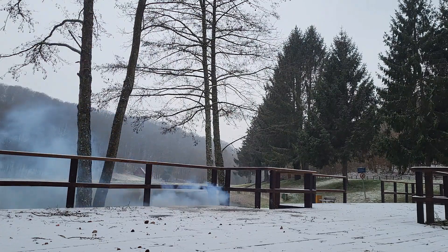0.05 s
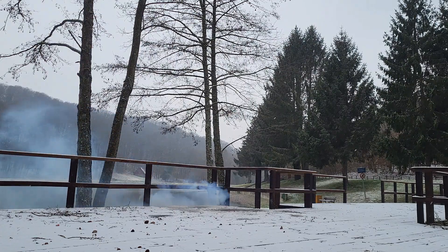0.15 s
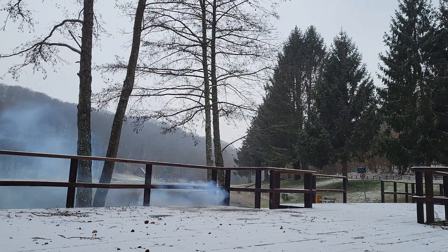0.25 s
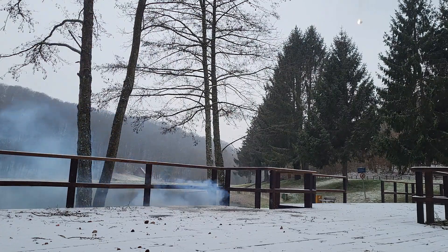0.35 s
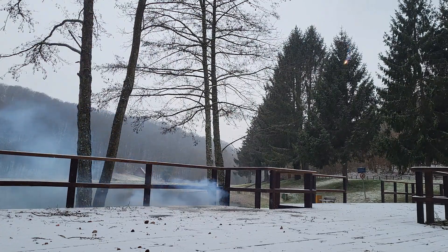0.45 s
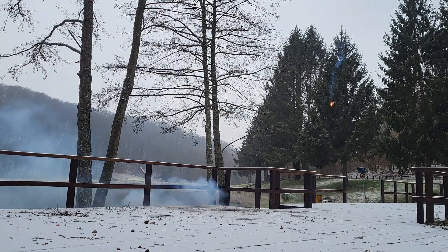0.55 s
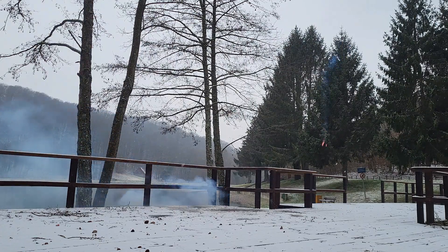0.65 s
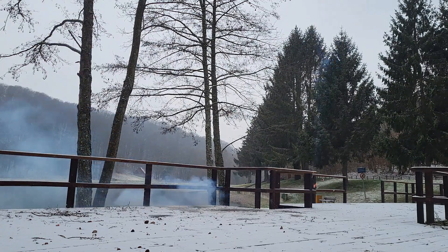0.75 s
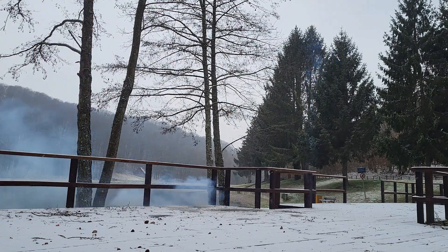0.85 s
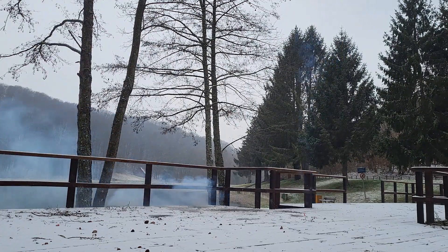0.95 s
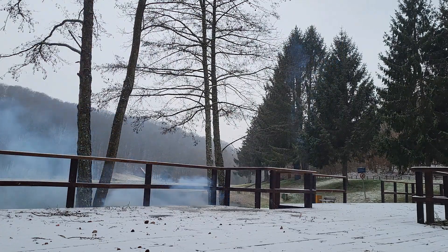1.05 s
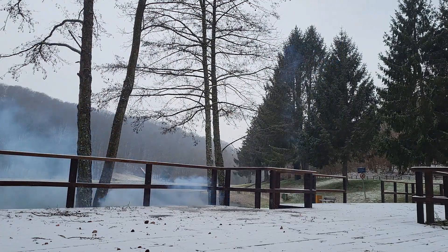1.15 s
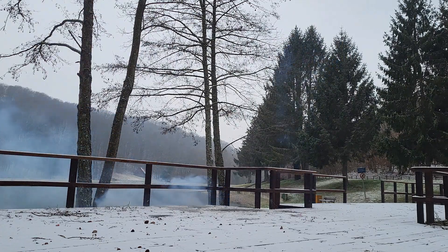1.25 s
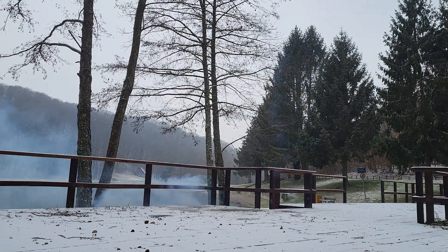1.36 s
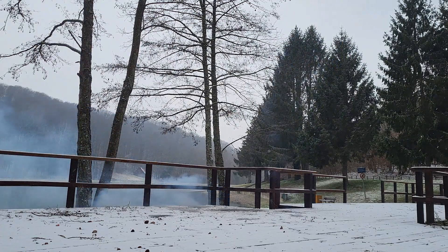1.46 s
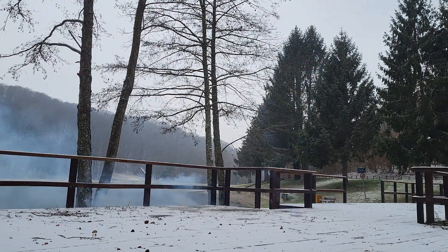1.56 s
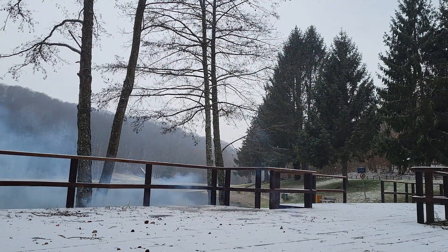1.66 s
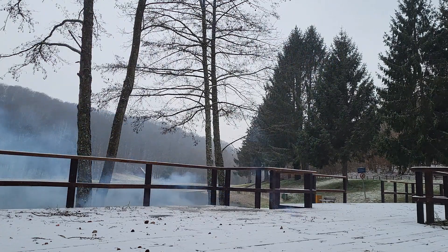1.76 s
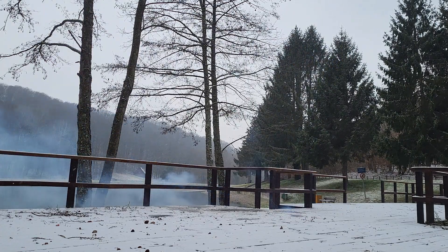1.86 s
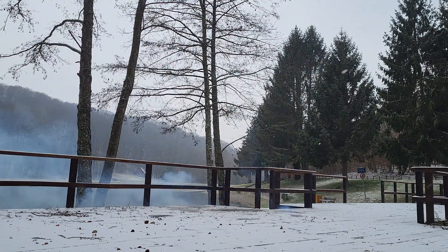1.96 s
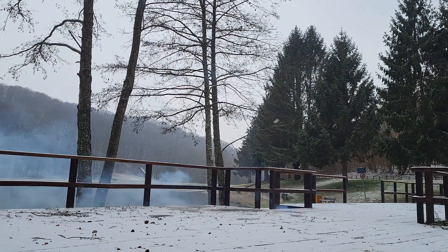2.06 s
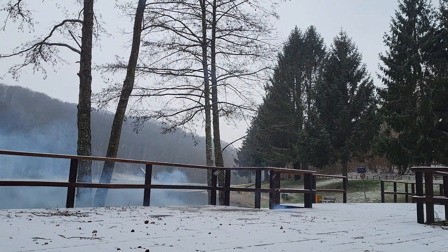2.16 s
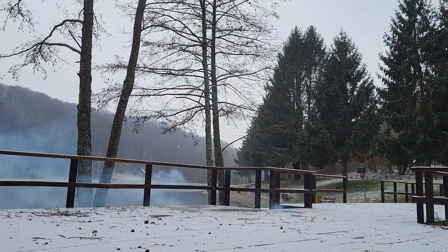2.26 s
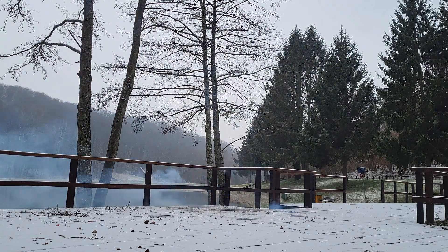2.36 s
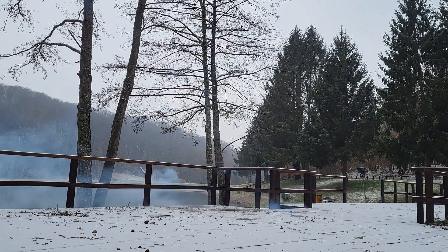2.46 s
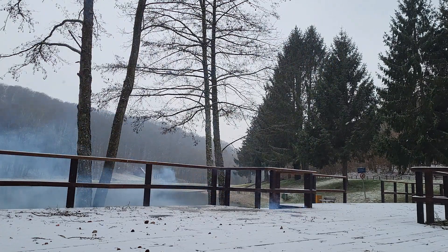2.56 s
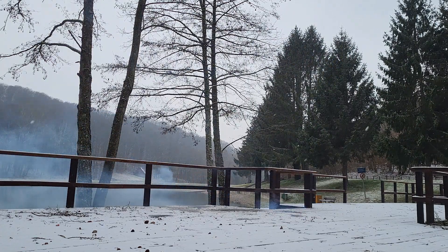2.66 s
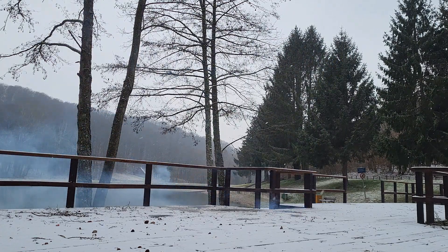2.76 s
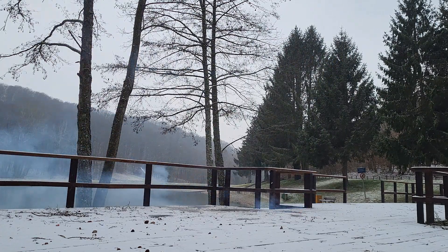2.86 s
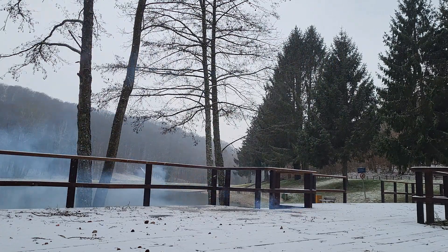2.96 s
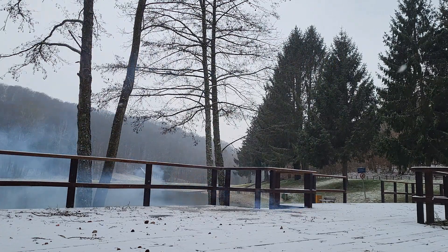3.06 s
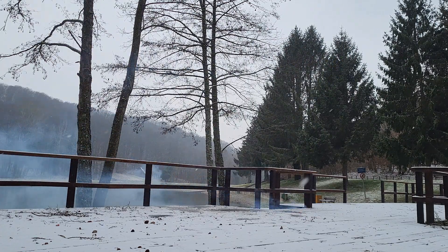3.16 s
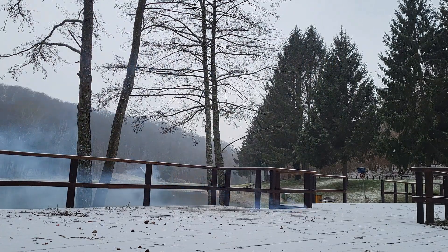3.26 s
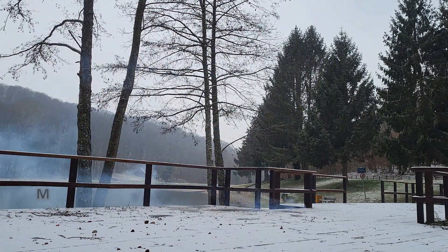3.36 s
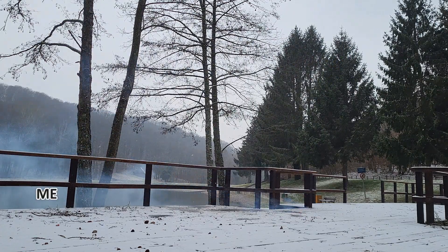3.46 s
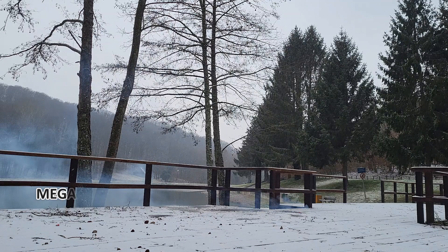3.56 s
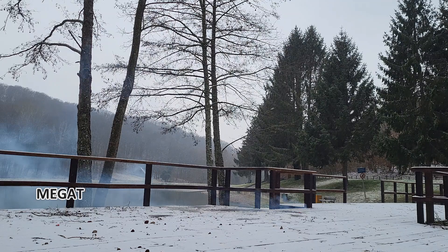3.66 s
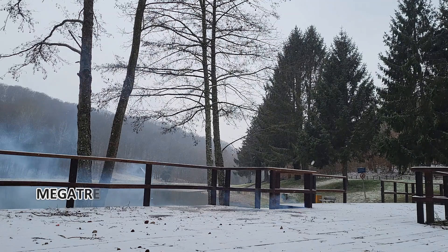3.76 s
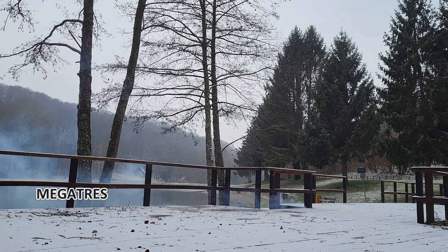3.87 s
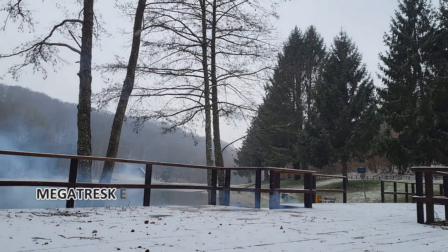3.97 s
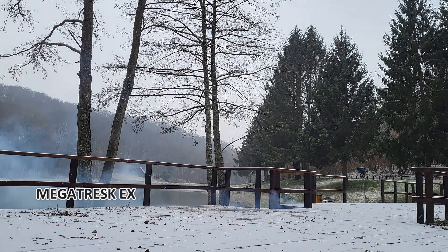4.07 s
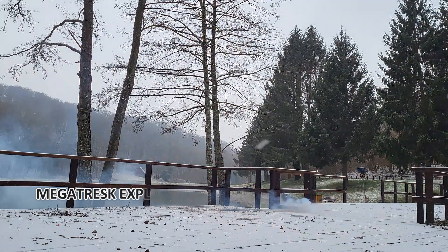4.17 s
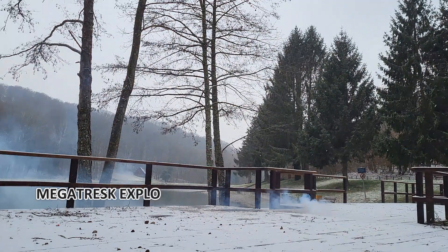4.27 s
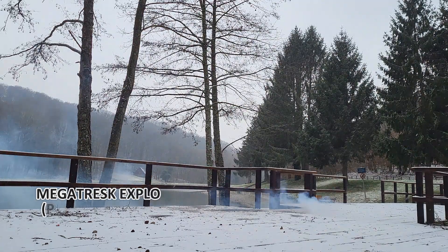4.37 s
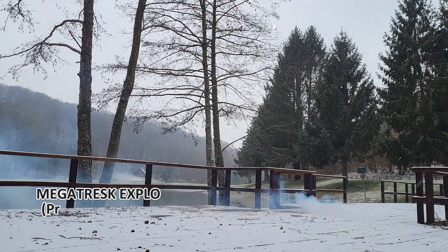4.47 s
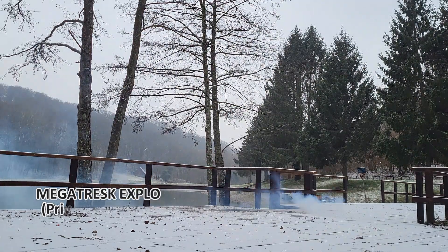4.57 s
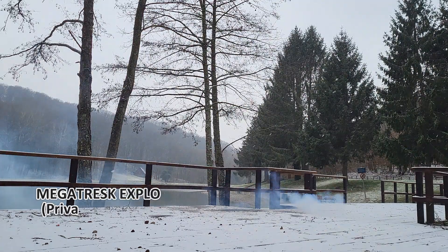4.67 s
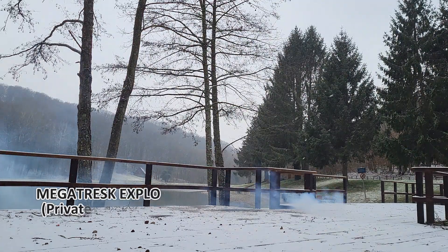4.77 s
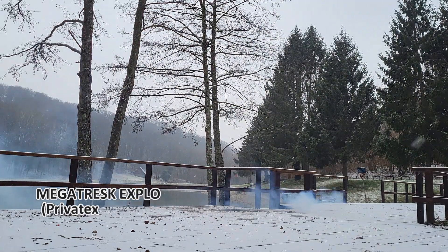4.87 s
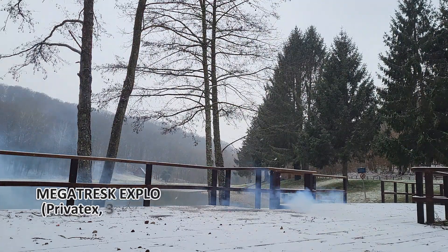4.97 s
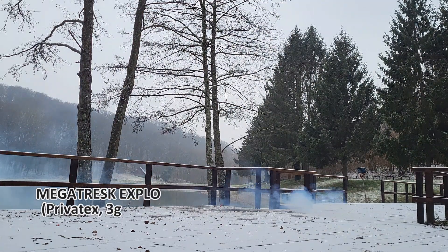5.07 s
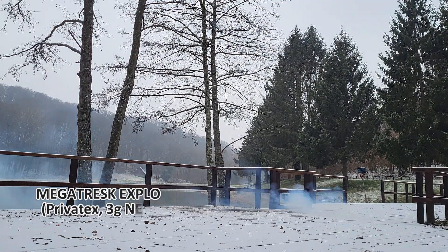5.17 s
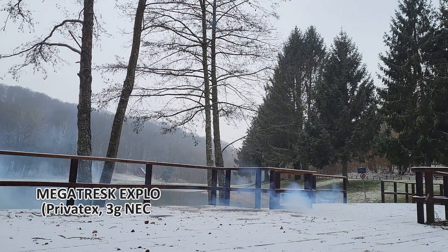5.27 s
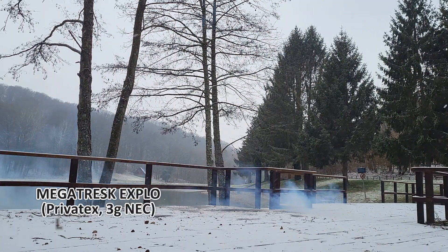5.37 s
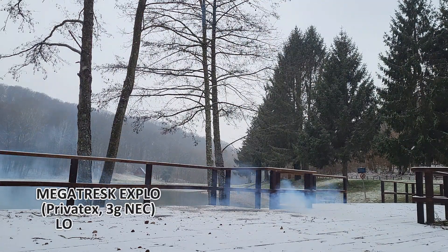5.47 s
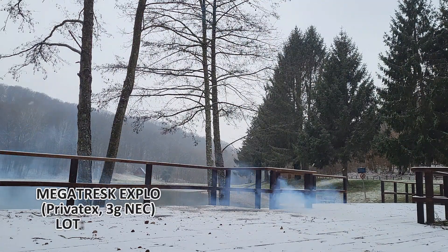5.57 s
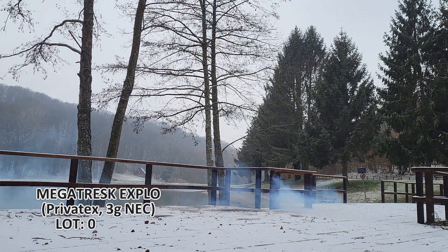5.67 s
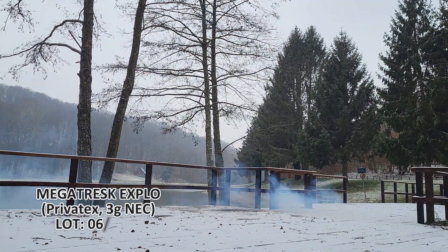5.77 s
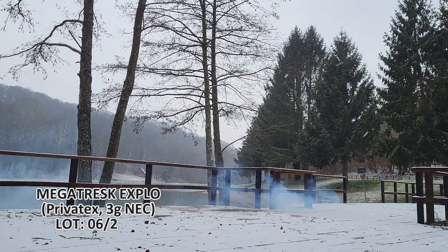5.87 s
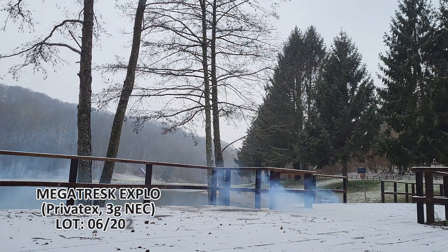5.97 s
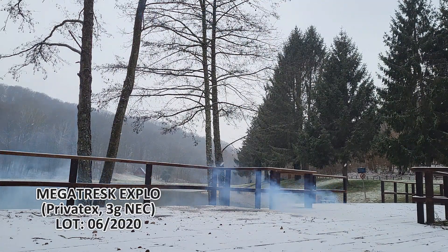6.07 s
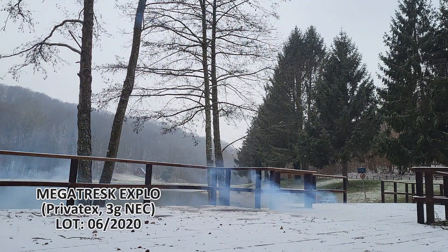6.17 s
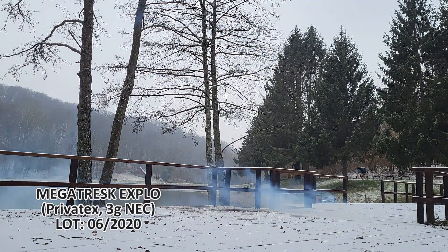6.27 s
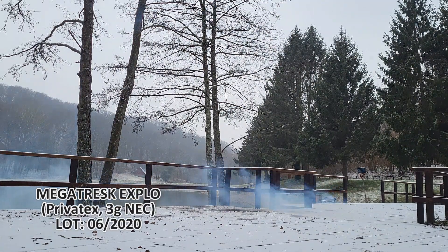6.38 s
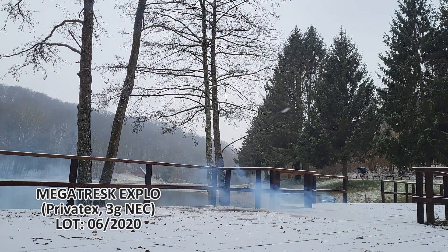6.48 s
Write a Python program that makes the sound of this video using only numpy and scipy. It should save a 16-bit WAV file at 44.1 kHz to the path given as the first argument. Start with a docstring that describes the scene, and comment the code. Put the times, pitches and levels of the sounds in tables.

```python
"""A snowy lakeside terrace in a wooded valley: firecrackers, heard by a phone with two microphone ports.
One bang has just gone off and its echo rolls round the hills, built from pressure swings and scattered noise.
Cloth rustles, a lighter clicks on the right as ringing modes, and a fuse hisses as sputtering noise.
The cracker is thrown past the phone, lands ahead and bangs; trunks and slopes send the bang back for seconds."""
import sys
import numpy as np
from scipy import signal
from scipy.fft import rfft, irfft
from scipy.io import wavfile
from scipy.ndimage import uniform_filter1d

SR = 44100
rng = np.random.default_rng(int(sys.argv[2]) if len(sys.argv) > 2 else 0)


def bounce(signal):
    """Save signal as a 16-bit WAV file at the path given by the first command-line argument."""
    frames = np.transpose(np.atleast_2d(signal))
    limited = np.clip(frames, -1, 1)
    pcm = np.round(limited * 32767).astype(np.int16)
    wavfile.write(sys.argv[1], SR, pcm)


N = 287774
T = np.arange(N) / SR
PORT_LAG_S = 0.00051  # longest lag between the two ports
SOUND_M_S = 343
TOP_HZ = 15900  # where the microphone's treble ends


def undb(db):
    """Decibels to gain."""
    return 10 ** (np.asarray(db) / 20)


def step(x, width):
    """A smooth step from 0 to 1 as x passes zero."""
    return .5 + .5 * np.tanh(x / width / 2)


def swell(s, half_s, db):
    """A smooth rise and fall of gain around one moment."""
    return undb(db) * np.exp(-((T - s) / half_s) ** 2)


def panned(x, db, pan_db):
    """Set the level of a stereo sound and its left minus right balance."""
    left = x[0] * undb(db + pan_db / 2)
    right = x[1] * undb(db - pan_db / 2)
    return np.array([left, right])


def spectrum_db(points, hz):
    """Read (Hz, dB) points on a log-frequency axis."""
    f, db = np.transpose(points)
    return np.interp(np.log(np.maximum(hz, 1)), np.log(f), db)


def colour(x, points, size=4096):
    """Causal minimum-phase filter with the given spectrum; white noise keeps its level."""
    gain = undb(spectrum_db(points, np.fft.rfftfreq(size, 1 / SR)))
    cepstrum = irfft(np.log(gain))
    # fold the cepstrum forward so the response starts at once
    cepstrum[1:size // 2] *= 2
    cepstrum[size // 2 + 1:] = 0
    response = irfft(np.exp(rfft(cepstrum)))
    response /= np.linalg.norm(response)
    return signal.oaconvolve(x, response[None])[:, :N]


def sweep(x, db_at, size=256):
    """Filter whose gain db_at(Hz, s) changes with time."""
    hz, s, frames = signal.stft(x, SR, nperseg=size)
    frames = frames * undb(db_at(hz[:, None], s))
    return signal.istft(frames, SR, nperseg=size)[1][..., :N]


def arrivals(s, gain, bearing, lean=0):
    """Impulses at both ports; one from the right reaches the left port later, and lean favours the left."""
    lag = PORT_LAG_S * np.sin(bearing) / 2
    ports = []
    for side in (1, -1):  # left, right
        sample = np.maximum((s + side * lag) * SR, 0).astype(int)
        ports.append(np.bincount(sample, gain * (1 + side * lean), N)[:N])
    return np.array(ports)


def scatter(regions, uneven_db, shading=0.21, count=50000):
    """Many small reflections: each region swells as the shock sweeps into it, then fades."""
    out = 0
    for peak_s, rise_s, db, fade, bearing, spread in regions:
        s = rng.uniform(0, N / SR, count)
        sign, size, angle, shade = rng.standard_normal((4, count))
        gain = np.sign(sign) * undb(uneven_db * size)
        gain *= np.sqrt(N / np.sum(gain ** 2))
        rise = np.exp(-(np.minimum(s - peak_s, 0) / rise_s) ** 2)
        gain *= rise * undb(db - fade * np.maximum(s - peak_s, 0))
        # the phone and the hand shade each path a little, at one port or the other
        out = out + arrivals(s, gain, bearing + spread * angle, shading * shade)
    return out


# The pressure swings behind the shock front.
# Each row: settled pitch in Hz, relative level in dB, time to fall 60 dB in seconds.
SWING_MODES = [(397.4, -0.5, 0.015), (612, -9.5, 0.03), (203, -12.5, 0.028), (58, -27, .06)]


def pressure_swings(rise_s=0.00091, hurry_s=0.00052, size=8192):
    """The dying swings of one blast wave; the first is the briefest."""
    t = T[:size]
    hurried = t + hurry_s * (1 - np.exp(-t / hurry_s))
    swings = sum(undb(db - 60 * t / t60) * np.sin(2 * np.pi * hz * hurried)
                 for hz, db, t60 in SWING_MODES)
    return (1 - np.exp(-t / rise_s)) * swings


# The shock itself and its clearest echoes.
# Each row: delay in seconds, level in dB, sharp front over that level in dB, bearing in radians (right positive).
SHOCK_PATHS = [(0, 7.5, -6.5, .2), (.005, -12.5, 5.5, .6), (.0065, -17.5, 8.5, .7), (.0097, -12.5, 9.5, .2),
               (.0185, -2.5, -11, .2), (.028, -4, -10.5, .1), (0.0426, -10, 6, 0), (.046, -7, -3, .3),
               (.0665, -14.5, 10.5, .8), (0.0778, -8, -11, .9), (.109, -15, -8, .6), (.128, -16, -8, .9),
               (.148, -25, -8, .5), (0.193, -15, -14, -1.0)]


def shock(front_s=0.000087, front_lean=-.22, splinter_db=-12, splinter_s=.0005, size=1024):
    """A sheer front that splinters on nearby edges, then the swings; each path keeps its own share of front."""
    t = T[:size]
    s, db, front_db, bearing = np.transpose(SHOCK_PATHS)
    body = signal.oaconvolve(arrivals(s, undb(db), bearing), pressure_swings()[None])
    splinters = rng.standard_normal((2, size)) * np.exp(-t / splinter_s)
    front = np.exp(-t / front_s) + undb(splinter_db) * splinters
    front_arrivals = arrivals(s, undb(db + front_db), bearing, front_lean)
    crack = signal.oaconvolve(front_arrivals, front, axes=1)
    return body[:, :N] + crack[:, :N]


# Ring of the planks and railing.
# Each row: pitch in Hz, level in dB, time to fall 60 dB in seconds.
DECK_MODES = [(42, -28, .18), (66, -24, .2), (88, -23, .2), (122, -17, .24), (174, -19, .26),
              (214, -17, .26), (309, -15, .28), (397, -17, .28), (442, -22, .26), (607, -13.5, .28),
              (680, -20, .28), (729, -17, .3), (852, -21.5, .3), (952, -22, .3), (991, -22, .3),
              (1050, -24, .3), (1204, -24.5, .36), (1372, -26, .32), (2729, -32, .45)]


def deck(rise_s=0.0051, bearing=.3, size=22050):
    """The blast sets the planks and railing ringing briefly, as a sum of decaying modes."""
    t = T[:size]
    ring = sum(undb(db - 60 * t / t60) * np.sin(2 * np.pi * (hz * t + rng.random()))
               for hz, db, t60 in DECK_MODES)
    ring = ring * (1 - np.exp(-t / rise_s))
    return signal.oaconvolve(arrivals(np.zeros(1), np.ones(1), bearing), ring[None])[:, :N]


def thickets(x, depth_db=0.5, patchy_db=0.77, smooth_samples=1000, count=9):
    """Uneven stands of trees return the sound in surges, a little different in each octave."""
    lumps = uniform_filter1d(rng.standard_normal((count + 1, N)), smooth_samples)
    lumps = uniform_filter1d(lumps, smooth_samples // 2)
    shared, *octaves = lumps / lumps.std()
    centres = np.log2(TOP_HZ) - np.arange(count)

    def db_at(hz, s):
        """Shared surge plus a crossfade between neighbouring octaves' surges."""
        weights = np.sqrt(np.maximum(1 - abs(np.log2(hz + 1) - centres), 0))
        patches = np.array([np.interp(s, T, lump) for lump in octaves])
        return depth_db * np.interp(s, T, shared) + patchy_db * weights @ patches
    return sweep(x, db_at, size=512)


# Steep banks and stands of trees that answer with a thud of their own.
# Each row: delay in seconds, base level in dB, bearing in radians (right positive).
STEEP_FACES = [(.222, -31, -0.45), (.456, -36, -1.4), (.532, -37, -1.7), (.655, -41, -1.3),
               (1.278, -48, -1.5), (1.688, -38.5, -1.1), (1.73, -36, -0.51), (1.829, -35, -0.45),
               (2.012, -37, -0.48), (2.2, -35, -0.29), (2.333, -35, -0.53), (2.363, -39, -0.56),
               (2.422, -35.5, -0.54), (2.528, -37, -0.6), (2.56, -34.5, -0.53), (2.648, -36.5, -0.8),
               (2.765, -35, -.3), (2.873, -32.5, -0.21), (2.967, -34, -0.49), (3.087, -38, 0.3),
               (3.13, -39.5, 0), (3.24, -40.5, -0.2), (3.287, -42, -0.62), (3.398, -43.5, -0.39)]
FACE_SPREAD_RAD = 0.36


def faces(rise_s=0.0041, fade_db_per_s=330, thud_db=10, smear_db=-2):
    """Each steep bank or stand of trees throws back the blast wave as one dull thud, with a short smear."""
    regions = [(s, rise_s, db + smear_db, fade_db_per_s, bearing, FACE_SPREAD_RAD)
               for s, db, bearing in STEEP_FACES]
    s, db, bearing = np.transpose(STEEP_FACES)
    thuds = signal.oaconvolve(arrivals(s, undb(db + thud_db), bearing), pressure_swings()[None])[:, :N]
    return thuds + colour(scatter(regions, uneven_db=4, count=16000), BLAST_SPECTRUM)


# Scatter from the railing, deck and nearest trunks, then from shore trees, firs, hillside and far slopes.
# Each row: strongest at delay in seconds, rise in seconds, level in dB, fade in dB per second,
# bearing in radians (right positive), spread in radians.
TERRACE_SCATTER = [(.006, 0.0049, -12.5, 186, 0.37, 0.97), (.055, 0.038, -16, 166.5, 0.28, 1.2)]
WOODS_SCATTER = [(.065, 0.064, -20.5, 93, .4, 1.56), (.22, 0.04, -34, 17.2, .9, 1.15),
                 (.46, 0.043, -43.5, 13.5, -1.2, 0.58), (1.8, 0.42, -35.5, 5.1, -0.74, 1.44),
                 (1.725, 0.015, -36.5, 15, -1.0, 0.53), (2.62, 0.82, -33, 11.5, -0.23, 1.35)]
# Tone of the near blast and of the woods' answer. Each row: frequency in Hz, relative level in dB.
BLAST_SPECTRUM = [(25, -28), (60, -17), (130, -1.5), (200, 1), (310, 3), (480, 2), (640, 0), (850, -5.5),
                  (1300, -5.5), (1900, -13.5), (4000, -17.5), (7650, -23), (9500, -32.5), (15500, -22.5)]
WOOD_SPECTRUM = [(25, -29), (45, -7.5), (80, -0.5), (140, 1), (300, 0.3), (480, 0), (650, 1), (850, -5.5),
                 (1300, -5.5), (2000, -8), (4000, -9.5), (7400, -9.5), (9000, -15.5), (15000, -19)]


def bang(air_db_per_s=118, relax_hz=8800, thin_hz=60, terrace_pan_db=-3.0):
    """One explosion with its echoes; cold air takes more treble the longer the sound has travelled."""
    terrace = colour(scatter(TERRACE_SCATTER, uneven_db=5.5), BLAST_SPECTRUM)
    left, right = shock() + deck() + panned(terrace, 0, terrace_pan_db)
    # the close blast is thin in the bass on the right
    right = signal.filtfilt(*signal.butter(1, thin_hz, "high", fs=SR), right, padtype=None)
    near = np.array([left, right])
    far = thickets(colour(scatter(WOODS_SCATTER, uneven_db=3.0), WOOD_SPECTRUM)) + faces()
    return sweep(near + far, lambda hz, s: -air_db_per_s * s * hz ** 2 / (hz ** 2 + relax_hz ** 2))


# The bangs; the first goes off just before the start. Each row: start in seconds, level in dB.
BANG_TIMES = [(-0.172, 0.48), (4.253, 0)]
# both ports leak bass, the right more; the left is duller
RIGHT_BASS_HZ, LEFT_BASS_HZ, LEFT_TREBLE_HZ = 104.4, 40, 13000


def bangs(pan_db=-0.07):
    """Each bang at its moment, coloured a little differently by the two ports."""
    out = np.zeros((2, N))
    for s, db in BANG_TIMES:
        start = int(s * SR)
        heard = bang()[:, max(-start, 0):N - max(start, 0)]
        out[:, max(start, 0):N + min(start, 0)] += undb(db) * heard
    left = signal.lfilter(*signal.butter(1, [LEFT_BASS_HZ, LEFT_TREBLE_HZ], "band", fs=SR), out[0])
    right = signal.lfilter(*signal.butter(1, RIGHT_BASS_HZ, "high", fs=SR), out[1])
    return panned(np.array([left, right]), 0, pan_db)


# Tone of rubbing cloth. Each row: frequency in Hz, relative level in dB.
CLOTH_SPECTRUM = [(1000, -21.5), (3500, -2), (5500, -2), (7500, 5), (9000, -3.5), (11000, -13),
                  (13000, -4.5), (15500, -10)]
# Hands and sleeves rub on the right. Each row: centre in seconds, half length in seconds, level in dB.
RUB_SWELLS = [(0.899, 0.39, -85.5), (1.87, 0.32, -71), (2.18, 0.13, -66.5), (2.574, 0.19, -68.5),
              (3.017, 0.18, -66), (6.263, 0.068, -77), (6.504, 0.15, -79)]
# One brisk scrape of the hands, a single row: centre in seconds, half length in seconds, level in dB.
HAND_SCRAPE = (6.478, 0.022, -46.5)


def rustle(grain_db=4, pan_db=-3, scrape_pan_db=-9):
    """Cloth and fingers rub in tiny slips: grainy noise, swelling with each movement."""
    slips = rng.standard_normal((2, N)) * undb(grain_db * rng.standard_normal(N))
    slips /= slips.std()
    rubs = colour(slips, CLOTH_SPECTRUM) * sum(swell(*row) for row in RUB_SWELLS)
    scrape = colour(slips, HISS_SPECTRUM) * swell(*HAND_SCRAPE)
    return panned(rubs, 0, pan_db) + panned(scrape, 0, scrape_pan_db)


# Puffs of air on the ports. Each row: centre in seconds, half length in seconds, level in dB.
PUFF_SWELLS = [(2.406, 0.023, -47), (2.713, 0.019, -39.5), (2.933, 0.35, -51.5), (3.355, 0.067, -49.5),
               (3.602, 0.054, -46.5)]
# Tone of a puff. Each row: frequency in Hz, relative level in dB.
PUFF_SPECTRUM = [(15, -3.5), (30, -11), (60, 8.5), (110, -4.5), (220, -14), (600, -35), (3000, -74)]


def puffs(pan_db=5):
    """Stirred air buffets each port on its own with a soft low thud."""
    air = colour(rng.standard_normal((2, N)), PUFF_SPECTRUM)
    return panned(air * sum(swell(*row) for row in PUFF_SWELLS), 0, pan_db)


# The lighter's snap and rebound. Each row: start in seconds, strength in dB.
LIGHTER_CLICKS = [(2.5426, 0.5), (2.5807, -28)]
# The lighter's ring. Each row: pitch in Hz, relative level in dB, time to fall 60 dB in seconds.
LIGHTER_MODES = [(2200, -34, .012), (3127, -32, 0.032), (3330, -33, .034), (4780, -35, 0.04),
                 (5140, -37, .03), (6284, -38, .035), (6640, -34, .028), (7050, -25.5, .018),
                 (7460, -11.5, .004), (7790, -30, .028), (7940, -29.5, 0.026), (8860, -9, 0.0042),
                 (9180, -27, .022), (9520, -29, .018), (13640, -33, .018)]


def lighter(shadow_db=-17, hands_db=-41.0, hands_t60=0.085, terrace_db=-53, terrace_t60=0.67,
            contact_s=0.00013):
    """A snap and a small rebound ring the lighter by the right port; hands and terrace scatter them to both."""
    out = 0
    for s, strength_db in LIGHTER_CLICKS:
        t = np.maximum(T - s, 0)
        ring = sum(undb(db - 60 * t / t60) * np.sin(2 * np.pi * hz * t) for hz, db, t60 in LIGHTER_MODES)
        ring = ring * (1 - np.exp(-t / contact_s))
        tail = undb(hands_db - 60 * t / hands_t60) + undb(terrace_db - 60 * t / terrace_t60)
        scattered = colour(rng.standard_normal((2, N)) * tail * (t > 0), HISS_SPECTRUM)
        direct = np.array([undb(shadow_db) * ring, ring])
        out = out + undb(strength_db) * (direct + scattered)
    return out


# the throw: a straight line from behind the phone, past its right side, to the landing place
PASSES_S, THROW_M_S, BESIDE_M, BEHIND_M, AHEAD_M = 3.583, 8.46, 0.49, 1.21, 3.1


def flight():
    """Distance (m) and bearing (rad) of the cracker: held, thrown at a steady speed, then lying still."""
    along = np.clip(THROW_M_S * (T - PASSES_S), -BEHIND_M, AHEAD_M)
    return np.hypot(along, BESIDE_M), np.arctan2(BESIDE_M, along)


# The cracker tumbles and part of its hiss flares.
# Each row: centre in seconds, half length in seconds, extra level in dB, centre pitch in Hz.
HISS_FLARES = [(3.39, .05, 4, 7510), (3.545, 0.045, 7, 7520), (3.64, 0.04, 7.5, 14500),
               (3.774, 0.11, 3, 2495)]
FLARE_OCTAVES = 0.9


def flare_db(hz, s):
    """Extra level of the hiss, by pitch and time, while the jet faces the phone."""
    total = 0
    for at, half_s, db, centre in HISS_FLARES:
        octaves = np.log2((hz + 1) / centre)
        total = total + db * np.exp(-((s - at) / half_s) ** 2 - (octaves / FLARE_OCTAVES) ** 2)
    return total


# the swish of the fly-by: when it is deepest, its half length, depth, width and fall
SWISH_S, SWISH_HALF_S, SWISH_DB, SWISH_OCTAVES, SWISH_OCTAVES_PER_S = 3.66, .09, -9.5, .22, 4.7
SWISH_LEFT_HZ, SWISH_RIGHT_HZ = 6310, 10700  # its centre at each port as the cracker passes


def swish_db(hz, s, passing_hz):
    """A hollow that slides down through the hiss as the cracker flies by."""
    centre = passing_hz * 2 ** (-SWISH_OCTAVES_PER_S * (s - PASSES_S))
    octaves = np.log2((hz + 1) / centre)
    return SWISH_DB * np.exp(-((s - SWISH_S) / SWISH_HALF_S) ** 2 - (octaves / SWISH_OCTAVES) ** 2)


# Tone of the hiss, also lent to lighter and scrape. Each row: frequency in Hz, relative level in dB.
HISS_SPECTRUM = [(300, -20.5), (1000, 1), (1700, 0), (2300, 0), (3100, -2), (4500, -1), (6400, -1.5),
                 (7600, 0.5), (8800, -7.5), (10000, -7.5), (11200, -12), (13000, -3.5), (15500, -8)]
# the fuse catches and burns up to full strength; level at 1 m
CATCH_S, FULL_BURN_S, GROW_DB_PER_S, FUSE_DB = 2.74, 3.276, 39, -43.5
# the thrower's body hides it until the arm swings out
SWING_OUT_S, SWING_S, HIDDEN_DB = 3.25, 0.052, -13
# the thrower's body and arm reflect the hiss until the cracker flies past:
# detour as the arm swings out and as the cracker passes (m), strength (dB)
HELD_DETOUR_M, PASSING_DETOUR_M, BODY_ECHO_DB = .76, .67, -4.5
# centre of the jet's hiss when the cracker comes and when it goes
JET_COMING_HZ, JET_GOING_HZ = 7420, 3700
# beyond this bearing the phone shades the treble at its left port
SHADE_DB, SHADE_RAD, SHADE_EDGE_RAD, SHADE_HZ = -14.5, 0.74, .15, 3900


def fuse(jet_db=4, jet_octaves=0.94, sputter_db=0.34, spark_db=3, diffuse=1.0, pan_db=-1,
         sputter_samples=200):
    """The fuse's gas jet sputters, darkens as it flies past and swings from the right to the front."""
    metres, bearing = flight()
    in_view = step(T - SWING_OUT_S, SWING_S)
    growth_db = -GROW_DB_PER_S * np.maximum(FULL_BURN_S - T, 0)
    db = FUSE_DB + growth_db + HIDDEN_DB * (1 - in_view) - 20 * np.log10(metres)
    shade_db = SHADE_DB * in_view * step(bearing - SHADE_RAD, SHADE_EDGE_RAD)
    jet_hz = JET_GOING_HZ + (JET_COMING_HZ - JET_GOING_HZ) * (1 - np.cos(bearing)) / 2

    slow_noise = uniform_filter1d(rng.standard_normal(N), sputter_samples)
    sputter = undb(sputter_db * np.sqrt(sputter_samples) * slow_noise)
    sparks = undb(spark_db * np.repeat(rng.standard_normal(N), 8)[:N])  # each holds for 8 samples
    gas = colour(rng.standard_normal((3, N)) * sputter * sparks, HISS_SPECTRUM)

    def jet_and_flares_db(hz, s):
        """A broad bump that follows the jet, plus the flares."""
        octaves = np.log2((hz + 1) / np.interp(s, T, jet_hz))
        return jet_db * np.exp(-(octaves / jet_octaves) ** 2) + flare_db(hz, s)
    gas = sweep(gas, jet_and_flares_db)

    # from behind, the sound bends round the phone's right end
    lag = PORT_LAG_S * in_view * np.sin(np.minimum(bearing, np.pi / 2))
    detour_m = np.interp(T, [SWING_OUT_S, PASSES_S], [HELD_DETOUR_M, PASSING_DETOUR_M])
    body_echo = np.interp(T - detour_m / SOUND_M_S, T, gas[0])
    # this echo makes the hiss hollow
    jet = gas[0] + undb(BODY_ECHO_DB) * step(PASSES_S - T, SWING_S) * body_echo
    direct = np.array([np.interp(T - lag, T, jet), jet])
    left, right = direct + diffuse * gas[1:]  # the deck and the thrower's body scatter a share

    def left_db(hz, s):
        """Treble shade and swish at the left port."""
        shade = np.interp(s, T, shade_db) * hz ** 2 / (hz ** 2 + SHADE_HZ ** 2)
        return shade + swish_db(hz, s, SWISH_LEFT_HZ)
    left = sweep(left, left_db)
    right = sweep(right, lambda hz, s: swish_db(hz, s, SWISH_RIGHT_HZ))
    burning = (T > CATCH_S) & (T < BANG_TIMES[-1][0])
    return panned(np.array([left, right]) / right.std() * burning, db, pan_db)


def left_dulled(x, top_hz=11000):
    """The small sounds reach the left port without their highest treble."""
    lowpass = signal.butter(1, top_hz, fs=SR, output="sos")
    return np.array([signal.sosfilt(lowpass, x[0]), x[1]])


# the level dips briefly: when, its half length and depth
DIP_S, DIP_HALF_S, DIP_DB = 4.007, .007, -10


def scene():
    """Bangs and echoes, with the small sounds of lighting the next cracker."""
    small_sounds = left_dulled(rustle() + lighter() + fuse())
    dip = undb(DIP_DB * swell(DIP_S, DIP_HALF_S, 0))
    return (bangs() + small_sounds + puffs()) * dip


def record(dry, ceiling=.93):
    """The microphone overloads on the shock, rounding its peaks; the top is cut."""
    rounded = ceiling * np.tanh(dry / ceiling)
    return signal.sosfilt(signal.ellip(10, .2, 80, TOP_HZ, fs=SR, output="sos"), rounded)


dry = scene()
out = record(dry)
bounce(out)
```